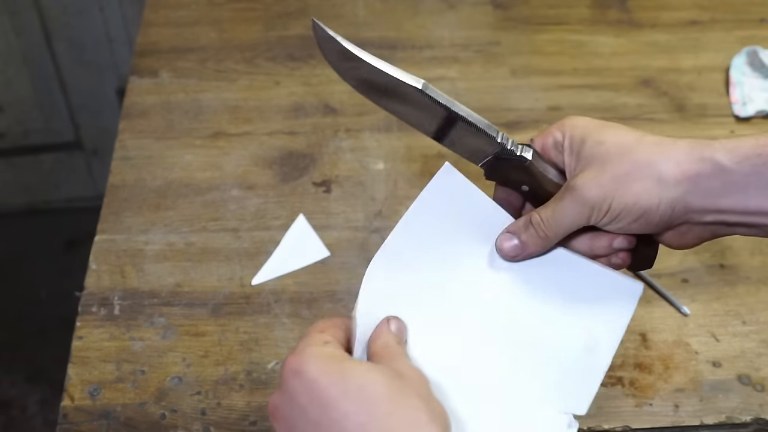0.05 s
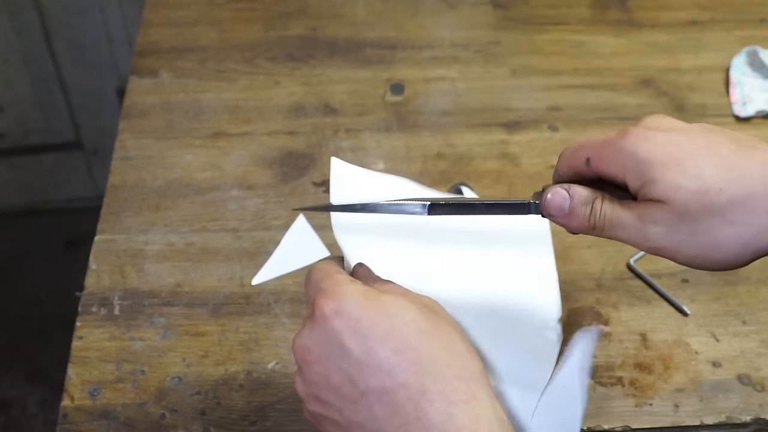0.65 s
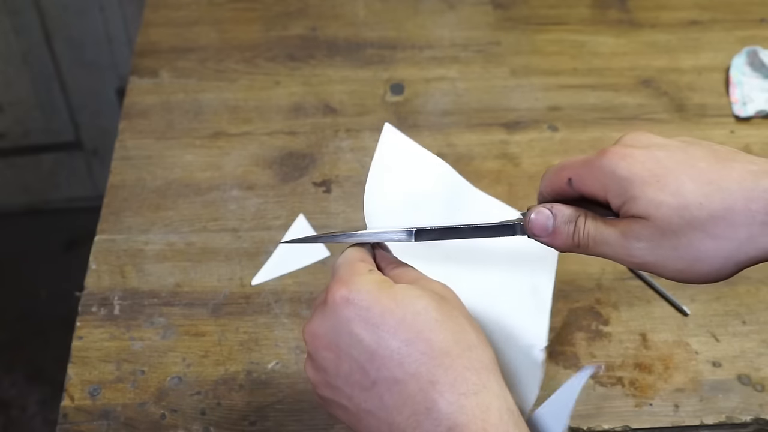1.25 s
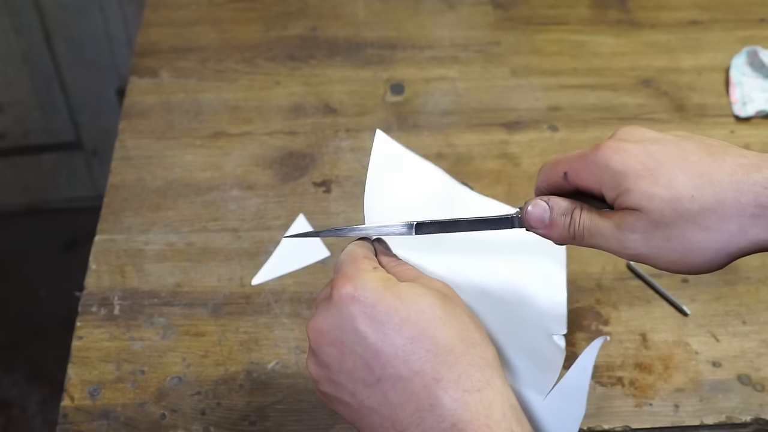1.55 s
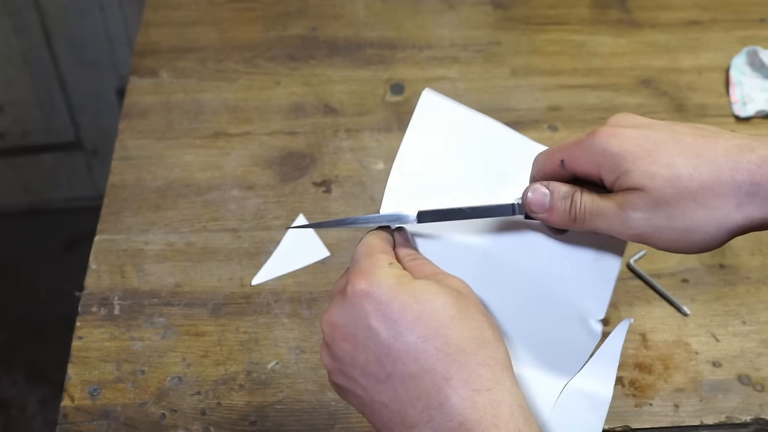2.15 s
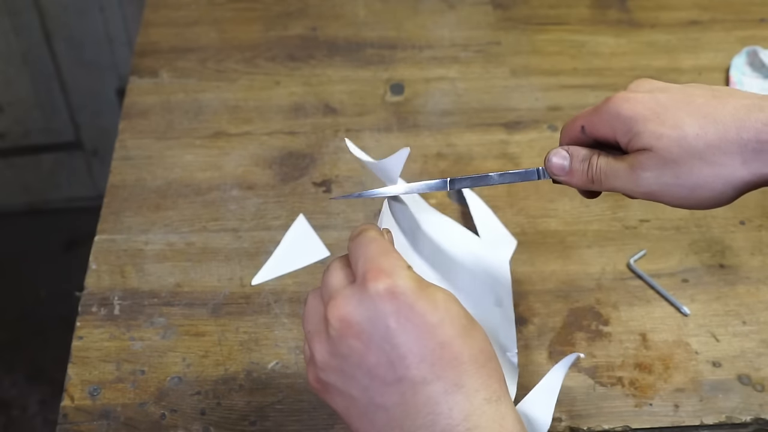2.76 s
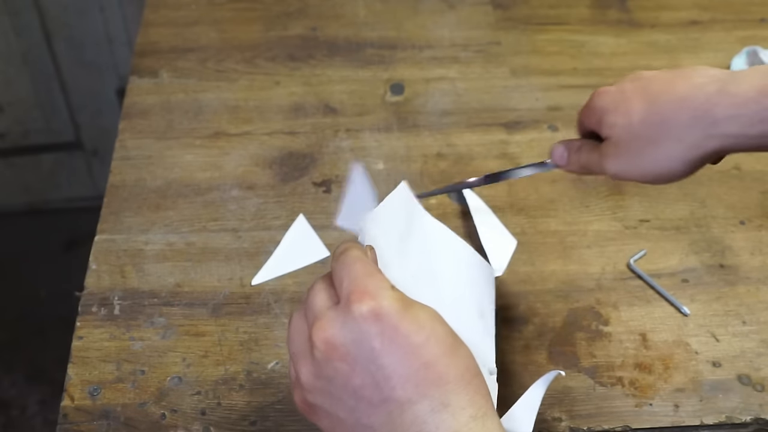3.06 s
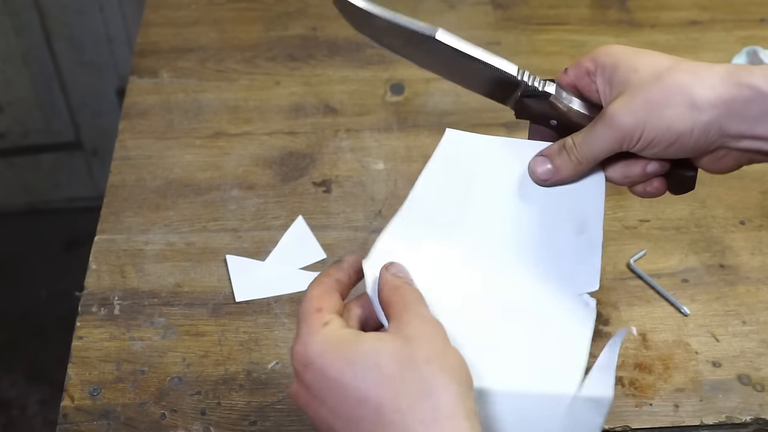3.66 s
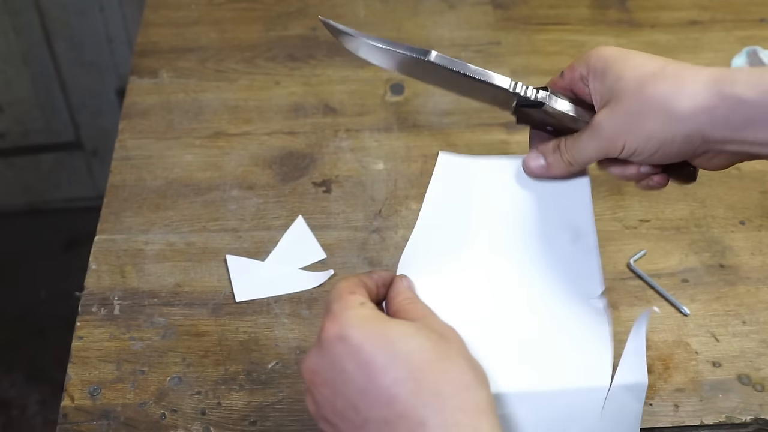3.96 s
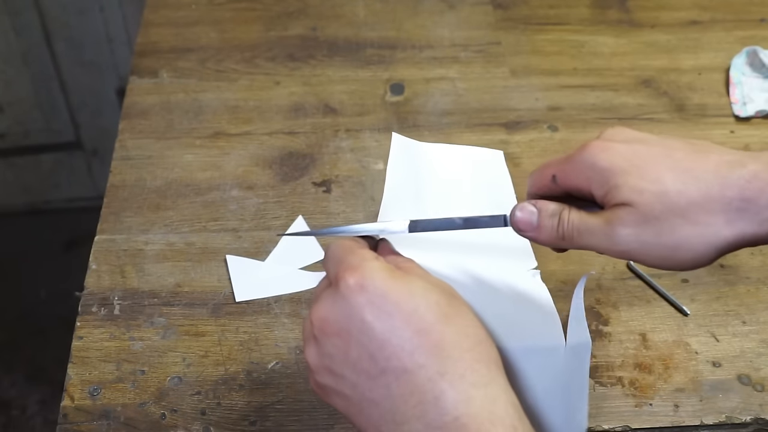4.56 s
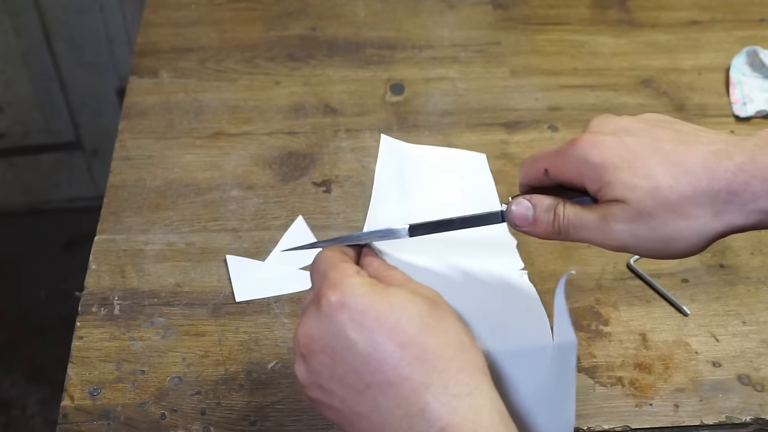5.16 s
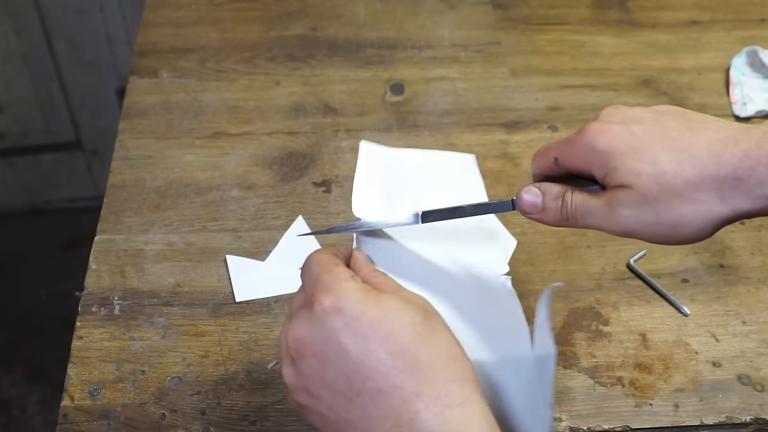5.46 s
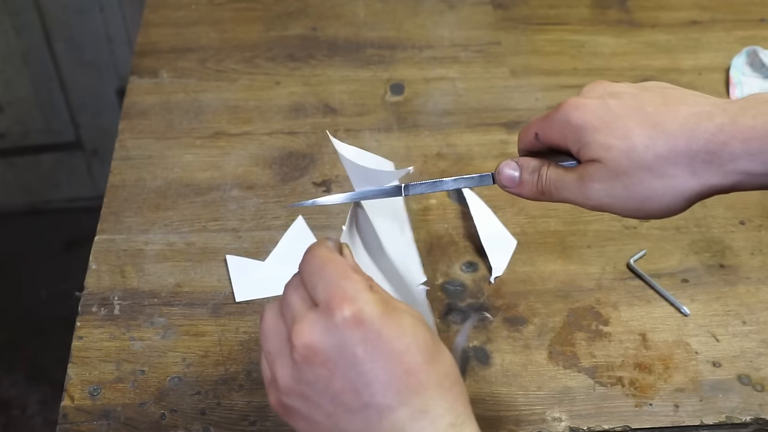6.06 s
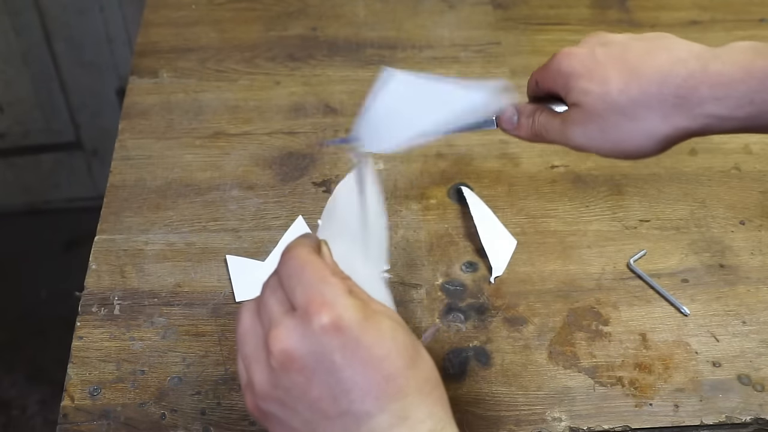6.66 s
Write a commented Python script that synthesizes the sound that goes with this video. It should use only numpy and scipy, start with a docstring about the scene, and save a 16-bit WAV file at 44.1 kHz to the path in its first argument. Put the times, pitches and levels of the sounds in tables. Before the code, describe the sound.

Paper rustles and pops in the fingers as a knife makes one long slice, then a run of short sawing cuts.

```python
"""At a wooden bench in a small workshop, a sharp knife slices a hand-held sheet of paper.
There is one long cut, a few quick strokes and later a sawing run of short cuts. Each is a dense
stream of snapping fibres that shake the sheet. Between cuts the paper slides in the fingers and
buckles with soft pops, and the blade ticks on its edge. The bench top and the room echo these
sounds over a quiet hush and a faint electrical whine."""
import sys
import numpy as np
from scipy import signal
from scipy.fft import rfft, irfft, next_fast_len
from scipy.io import wavfile
from scipy.ndimage import map_coordinates

SR = 44100
rng = np.random.default_rng(int(sys.argv[2]) if len(sys.argv) > 2 else 0)


def int16_out(signal):
    """Quantize to a 16-bit WAV file."""
    q = np.round(np.clip(np.atleast_2d(signal).T, -1, 1) * 32767)
    wavfile.write(sys.argv[1], SR, q.astype(np.int16))


N = 300762

# tone colour of the room's hush: (frequency [Hz], relative level [dB])
HUSH_COLOUR = [(26, -17), (45, -5.5), (173, -11), (268, -10.5), (303, -10.5), (600, -10), (1190, -16),
               (1310, -13.5), (13100, -23.5), (15500, -28.5)]
# the hush wavers: (time [s], level [dB])
HUSH_LEVELS = [(1, -62.5), (4, -60), (4.3, -66), (4.7, -65.5), (5.2, -62.5)]
# how alike the hush is in both ears: (frequency [Hz], likeness [1 = same])
HUSH_LIKENESS = [(40, 1), (150, 0.6), (500, 0), (2000, 0), (10000, 0.025)]
# electrical whine: (frequency [Hz], level [dB])
WHINE_TONES = [(12950, -86)]
# paper sliding: (start [s], rise [s], fall [s], level [dB], fizz adjustment [dB], resonance [Hz])
PAPER_SLIDES = [(.014, 0.021, 0.11, -42.5, -10, 2340), (.15, 0.041, 0.058, -46, -5, 2390),
                (.245, 0.047, 0.12, -53, 6, 2350), (.365, 0.068, 0.084, -50, 8, 2560),
                (.54, 0.018, 0.21, -52.5, 4, 2690), (.69, 0.028, 0.07, -56.5, 9, 2900),
                (.824, 0.012, 0.13, -53, 6, 3120), (1.003, .012, .15, -55, 11.5, 3340),
                (1.314, 0.015, 0.084, -52.5, -1, 2680), (1.413, .008, 0.041, -48.5, 1, 2500),
                (1.645, 0.015, 0.055, -58, -1, 2330), (1.91, 0.02, .12, -57.5, -1, 2300),
                (2.084, 0.024, 0.24, -53, -2, 2250), (3.25, 0.029, 0.2, -56, -2, 2280),
                (3.452, 0.029, 0.047, -51, -5, 2500), (3.532, 0.028, 0.11, -48, 3.5, 2440),
                (3.69, .02, 0.064, -53, -6, 2290), (3.74, 0.026, 0.26, -60, -22, 1980),
                (3.903, 0.063, 0.04, -46, 7, 3560), (4.453, 0.011, 0.044, -50.5, -4, 3230),
                (4.698, 0.075, 0.11, -57, 7, 3200), (4.84, 0.065, .09, -59.5, 3.5, 3150),
                (5.109, .02, 0.45, -60, 2, 3000)]
# tone colour of rubbing: (frequency [Hz], relative level [dB])
RUB_COLOUR = [(40, -35), (150, -27), (400, -6), (750, -1.5), (1200, -10), (2100, -0.5), (3500, 0.5),
              (5500, -2.5), (9000, -6.5), (16000, -9.5)]
# tone colour of the bright fizz: (frequency [Hz], relative level [dB])
FIZZ_COLOUR = [(300, -65.5), (2000, -17), (4500, -1.5), (7000, -1), (9800, 0), (11500, -2), (14000, -1),
               (16000, -10)]
# the sheet buckles: (time [s], level [dB], flap adjustment [dB], snap pitch [Hz], relative crumple [dB])
PAPER_POPS = [(0.0376, -26.5, -6.5, 2620, -9.5), (0.0465, -30.5, -1, 2100, -8.5),
              (0.1032, -32.5, -7, 2160, -15), (0.167, -29.5, -18, 2620, -14), (0.434, -44.5, 1, 4800, -16),
              (0.5108, -28, -15, 2840, -13), (0.5242, -30, -6, 2420, -11), (0.7424, -40.5, -6, 1770, -9.5),
              (0.7671, -34.5, -12.5, 2170, -7.5), (0.831, -35, -10.5, 1700, -15),
              (0.8772, -40, -8.5, 2920, -13), (1.197, -59, 10, 1990, -12), (1.3017, -62, 14, 2230, -9),
              (1.8928, -41, -1.5, 2370, -7.5), (1.9106, -37, -4.5, 1760, -8),
              (3.0027, -39, -4.5, 1900, -26), (3.441, -34.5, -10, 2600, -23), (3.5316, -30, -13, 3270, -20),
              (3.6207, -37.5, -7.5, 2620, -14.5), (3.9784, -44, 4, 2210, -28), (4.051, -47.5, 2, 1960, -23),
              (5.0709, -23, -19.5, 2880, -20), (5.0879, -18.5, -22, 3370, -23),
              (6.461, -28, -13, 3000, -21), (6.787, -60.5, 8.5, 2200, -24)]
# tone colour of a pop's snap: (frequency [multiple of its pitch], relative level [dB])
SNAP_COLOUR = [(.03, -25), (.2, -15.5), (.55, -3.5), (1, 2), (1.35, -5), (2, -17), (6, -37)]
# tone colour of a pop's low flap: (frequency [Hz], relative level [dB])
FLAP_COLOUR = [(30, -27), (140, -14), (290, -8.5), (390, 0), (540, -4), (780, 0), (1100, -7.5), (1800, -23),
               (5000, -55)]
# tone colour of tearing: (frequency [Hz], relative level [dB])
TEAR_COLOUR = [(60, -67), (300, -36), (1000, -18), (1450, -9.5), (1700, -3.5), (2500, -0.5), (3900, 0),
               (4700, -1), (6500, -6), (10000, -10.5), (16000, -28)]
# tone colour of the fluttering cut strip: (frequency [Hz], relative level [dB])
FLUTTER_COLOUR = [(50, -35.5), (135, -8), (280, 3.5), (450, 6), (1000, -47)]
# resonances, where the held sheet likes to ring: (frequency [Hz], width [Hz], relative level [dB])
SHEET_RESONANCES = [(412, 88, -11), (621, 124, -10.5), (779, 79, 0.5), (1140, 223, -7)]
# quick strokes, including rips out of the sheet: (start [s], rise [s], fall [s], level [dB],
# relative first bite [dB], relative drumming [dB], relative fizz [dB], resonance [Hz])
QUICK_CUTS = [(1.432, .056, 0.052, -43.5, -8, -7, 5, 2500), (2.92, 0.044, 0.024, -41, -17, -7, 11, 2400),
              (5.24, 0.12, 0.081, -33, -13, -21.5, 2.5, 3140),
              (5.587, 0.11, 0.087, -37.5, -8.5, -9.5, 4, 3140),
              (5.837, 0.088, 0.098, -34.5, -8, -10.5, -2, 2580),
              (6.064, 0.088, 0.11, -36.5, -17, -8, -4.5, 2200),
              (6.348, 0.13, .15, -37.5, -14.5, -6, 3, 2700),
              (6.52, 0.048, 0.069, -39, -10, -4.5, 6.5, 2640)]
# the long cut: (time [s], level [dB], relative drumming [dB], relative fizz [dB])
LONG_CUT_LEVELS = [(2.17, -47, -17, 4), (2.18, -39.5, -11, 7), (2.226, -36.5, -14, 2.5),
                   (2.24, -30, -20, -6), (2.28, -33, -15.5, 2), (2.304, -31.5, -22.5, 2.5),
                   (2.394, -33, -25.5, -2), (2.468, -39, -18, -4.5), (2.88, -39.5, -7.5, 0),
                   (2.956, -40, -2.5, 8.5), (3.026, -44, -10.5, 0.5), (3.07, -56, -7, -3)]
# the paper tightens in the long cut, ringing higher, then slackens: (time [s], resonance [Hz])
LONG_CUT_RESONANCE = [(2.27, 2250), (2.33, 5300), (2.39, 4800), (2.46, 2120), (2.8, 2400), (2.9, 1900)]
# the blade ticks on the paper: (time [s], level before the trims in blade_ticks [dB])
BLADE_TICKS = [(2.1798, -24.5), (3.158, -50), (3.1619, -26)]
# the blade's ringing tones: (frequency [Hz], relative level [dB], time to fade by 60 dB [s])
STEEL_TONES = [(1908, -2, .04), (3127, -6, .04), (3716, 4, .11), (3802, -5, .07), (12300, -6, .12)]
# the room's echo: (frequency [Hz], time to fade by 60 dB [s])
ROOM_FADE = [(150, 0.97), (700, 0.41), (2500, 0.35), (7000, 0.33), (15000, 0.18)]
# how alike the echoes are in both ears: (frequency [Hz], likeness [1 = same])
ECHO_LIKENESS = [(150, 0.86), (600, 0.81), (1400, 0.43), (4000, -0.033), (15000, -0.073)]
# the two microphones differ in tone: (frequency [Hz], left minus right [dB])
MIC_BALANCE = [(200, 0.5), (700, -2.5), (1300, 0.6), (2400, -0.6), (8000, 1.5), (14000, 2.5)]


def amp(db):
    """Turn decibels into a number to multiply by."""
    return 10 ** (np.asarray(db) / 20)


def unit(x):
    """Scale x to an average power of 1."""
    return x / np.sqrt(np.mean(x ** 2) + 1e-20)


def along(points, hz):
    """Read between the rows of a (frequency, value) table, on a pitch scale."""
    freqs, values = np.transpose(points)
    return np.interp(np.log(hz + 1), np.log(freqs + 1), values)


def wobble(rate, size):
    """A smooth random curve through rate points a second."""
    return map_coordinates(rng.standard_normal(400), [np.arange(size) * rate / SR], mode="wrap")


def filtered(x, response):
    """Multiply each frequency in x by response(frequency)."""
    size = x.shape[-1]
    padded = next_fast_len(size + 8192)
    return irfft(rfft(x, padded) * response(np.fft.rfftfreq(padded, 1 / SR)), padded)[..., :size]


def coloured(x, colour, size=2048):
    """Give x a tone colour, at an average power of 1."""
    cepstrum = irfft(np.log(amp(along(colour, np.fft.rfftfreq(size, 1 / SR)))))
    # this fold makes the filter ring only after a click, never before it
    cepstrum[1:size // 2] *= 2
    cepstrum[size // 2 + 1:] = 0
    ring = irfft(np.exp(rfft(cepstrum)))
    return unit(signal.fftconvolve(x, ring)[:len(x)])


def add(track, start_s, x):
    """Mix x into track from start_s on."""
    start = max(round(start_s * SR), 0)
    part = track[..., start:start + x.shape[-1]]
    part += x[..., :part.shape[-1]]


def stereo(x, likeness):
    """Blend two unrelated signals into a left and a right that are partly alike."""
    turn = lambda hz: np.arccos(np.clip(along(likeness, hz), -1, 1)) / 2
    mid, side = filtered(x, lambda hz: np.array([np.cos(turn(hz)), np.sin(turn(hz))]))
    return np.array([mid + side, mid - side])


def panned(db):
    """Left and right gains that make the left louder by db."""
    return amp(np.array([[.5], [-.5]]) * db)


def room_air():
    """A quiet hush, alike in both ears only in the bass, and a thin electrical whine."""
    t = np.arange(N) / SR
    noise = stereo(rng.standard_normal((2, N)), HUSH_LIKENESS)
    hush = filtered(noise, lambda hz: amp(along(HUSH_COLOUR, hz)))
    whine = sum(amp(db) * np.sqrt(2) * np.sin(2 * np.pi * hz * t + 1.5 * wobble(55, N))
                for hz, db in WHINE_TONES)
    return amp(np.interp(t, *np.transpose(HUSH_LEVELS))) * unit(hush) + whine


def stroke(rise_s, fall_s, bite_s, entry_db, fall_power):
    """One sweep of the hand swells, then drops 20 dB in fall_s. Gives (time from peak, gain)."""
    t = np.arange(0, rise_s + 2 * fall_s, 1 / SR)
    swell_db = entry_db * np.clip(1 - t / rise_s, 0, 1) ** 2
    release_db = -20 * np.clip((t - rise_s) / fall_s, 0, None) ** fall_power
    return t - rise_s, np.clip(t / bite_s, 0, 1) * amp(swell_db + release_db)


def fibres(size, per_s, spread_db, clump_db):
    """Paper fibres snap: random clicks of uneven strength that come in clumps."""
    snaps = (rng.random(size) < per_s / SR) * rng.standard_normal(size)
    strength_db = spread_db * rng.standard_normal(size) + clump_db * wobble(172.9, size)
    return unit(snaps * amp(strength_db))


def paper_resonance(x, centre_hz, width_octaves, lift_db=3.5):
    """The paper boosts one broad band of sound, higher in pitch the tighter it is held."""
    hz, t, spectra = signal.stft(x, SR, nperseg=256)
    centre = np.interp(t, np.arange(len(x)) / SR, centre_hz * np.ones(len(x)))
    octaves = np.log2((hz[:, None] + 1) / centre)
    boost = amp(lift_db * np.exp(-(octaves / width_octaves) ** 2))
    return signal.istft(spectra * boost, SR, nperseg=256)[1][:len(x)]


def paper_slides():
    """Paper rubs over skin and steel with a fine, soft grain."""
    out = np.zeros(N)
    for start_s, rise_s, fall_s, db, fizz_db, hz in PAPER_SLIDES:
        _, swell = stroke(rise_s, fall_s, bite_s=0.0028, entry_db=-9.5, fall_power=1.48)
        grain = fibres(len(swell), per_s=14000, spread_db=0.5, clump_db=2.0)
        rub = coloured(grain, RUB_COLOUR) + amp(fizz_db - 7.0) * coloured(grain, FIZZ_COLOUR)
        add(out, start_s, amp(db) * swell * paper_resonance(rub, hz, width_octaves=0.59))
    return out


def burst(colour, fade_s, crumple_db=-60, size=12000):
    """A short crack fades by 60 dB in fade_s; the crease goes on crumpling softly."""
    t = np.arange(size) / SR
    crack = rng.standard_normal(size) * amp(-60 * t / fade_s)
    crumple = fibres(size, per_s=2500, spread_db=2.0, clump_db=6.5) * amp(crumple_db - 60 * t / 0.21)
    strength = np.sqrt(np.mean(crack ** 2 + crumple ** 2)) / 1.88
    return strength * coloured(crack + crumple, colour)


def paper_pops():
    """A bend in the sheet flips through: a snap and a slower flap."""
    out = np.zeros((2, N))
    for start_s, db, flap_db, hz, crumple_db in PAPER_POPS:
        snap_colour = [(multiple * hz, level) for multiple, level in SNAP_COLOUR]
        snap = burst(snap_colour, fade_s=.022, crumple_db=crumple_db)
        flap = amp(flap_db + 5.5) * burst(FLAP_COLOUR, fade_s=.04, crumple_db=crumple_db)
        place = panned(rng.normal(-2, 1.5))  # scattered a little to the right
        add(out, start_s, place * amp(db) * (snap + flap))
    return out


def sheet_drum(hz):
    """How the held sheet answers each frequency, like a small drum."""
    return sum((-1) ** k * amp(db) * 1j * hz * width / (centre ** 2 - hz ** 2 + 1j * hz * width)
               for k, (centre, width, db) in enumerate(SHEET_RESONANCES))


def tearing(t, drum_db, fizz_db, centre_hz):
    """The edge parts fibres; the same snaps rasp, fizz, drum the sheet and shake the cut strip."""
    thick = amp(-11.5) * fibres(len(t), per_s=260, spread_db=3.5, clump_db=3.5)
    fine = fibres(len(t), per_s=14000, spread_db=0.0, clump_db=0.4)
    snaps = unit(fine + thick)
    freed_s, held_db, loose_db = 5.94, -25.5, -12.5  # the strip flutters more once it hangs loose
    flutter = amp(np.where(t < freed_s, held_db, loose_db)) * coloured(snaps, FLUTTER_COLOUR)
    drum = amp(drum_db) * (unit(filtered(snaps, sheet_drum)) + flutter)
    fizz = amp(fizz_db) * coloured(snaps, FIZZ_COLOUR)
    return paper_resonance(coloured(snaps, TEAR_COLOUR) + drum + fizz, centre_hz, width_octaves=0.52)


def quick_cuts():
    """In each quick stroke the edge bites at once, speeds up and runs out."""
    out = np.zeros(N)
    sag_octaves_per_s = 0.71  # the paper slackens, so its resonance sinks
    for start_s, rise_s, fall_s, db, bite_db, drum_db, fizz_db, hz in QUICK_CUTS:
        from_peak, swell = stroke(rise_s, fall_s, bite_s=0.014, entry_db=bite_db, fall_power=1.76)
        centre_hz = hz * 2 ** (-sag_octaves_per_s * from_peak)
        tear = tearing(start_s + rise_s + from_peak, drum_db, fizz_db, centre_hz)
        add(out, start_s, amp(db) * swell * tear)
    return out


def long_cut():
    """The blade is drawn through the whole sheet in one go."""
    out = np.zeros(N)
    times, *levels = np.transpose(LONG_CUT_LEVELS)
    t = np.arange(times[0], times[-1], 1 / SR)
    db, drum_db, fizz_db = (np.interp(t, times, column) for column in levels)
    centre_hz = np.interp(t, *np.transpose(LONG_CUT_RESONANCE))
    bite_s, release_s = 0.004, 0.06
    contact = np.clip(np.minimum((t - times[0]) / bite_s, (times[-1] - t) / release_s), 0, 1)
    add(out, times[0], contact * amp(db) * tearing(t, drum_db, fizz_db, centre_hz))
    return out


def blade_ticks():
    """The blade catches or flicks off the paper's edge; the steel rings briefly, damped by the hand."""
    out, t = np.zeros(N), np.arange(SR // 3) / SR
    ring_trim_db, click_trim_db = -22, -2.5
    for start_s, db in BLADE_TICKS:
        ring = sum(amp(level - 60 * t / fade_s) * np.sin(2 * np.pi * (hz * t + rng.random()))
                   for hz, level, fade_s in STEEL_TONES)
        click = burst(FIZZ_COLOUR, fade_s=0.02) + burst(RUB_COLOUR, fade_s=0.023)
        add(out, start_s, amp(db + ring_trim_db) * ring)
        add(out, start_s, amp(db + click_trim_db) * click)
    return panned(2.5) * out


def echoes(near_db, tail_db, near_fade_s):
    """Two echo patterns: quick bounces off bench and hands, then the room, whose treble dies first."""
    hz, t, spectra = signal.stft(rng.standard_normal((2, SR // 3)), SR, nperseg=256)
    fade = amp(-60 * t / along(ROOM_FADE, hz)[:, None])
    build_up = np.clip(t / 0.0063, 0, 1)
    tail = signal.istft(spectra * fade * build_up, SR, nperseg=256)[1]
    size = tail.shape[1]
    near = rng.standard_normal(tail.shape) * amp(-60 * np.arange(size) / SR / near_fade_s)
    return (amp(near_db) * unit(near) + amp(tail_db) * unit(tail)) / np.sqrt(size)


def workshop(x, near_db, tail_db, near_fade_s, size=12000):
    """The direct sound plus echoes whose pattern keeps changing as hands and sheet move."""
    direct, echoed = x * np.ones((2, 1)), np.zeros((2, N))
    crossfade = np.sin(np.pi * np.arange(size) / size)
    for start in range(0, N, size // 2):
        part = direct[:, start:start + size].mean(axis=0, keepdims=True)
        pattern = echoes(near_db, tail_db, near_fade_s)
        add(echoed, start / SR, signal.fftconvolve(part * crossfade[:part.shape[1]], pattern, axes=1))
    total_power = 1 + (amp(near_db) ** 2 + amp(tail_db) ** 2) / 2
    return (direct + stereo(echoed, ECHO_LIKENESS)) / np.sqrt(total_power)


def scene():
    """Slicing and handling echo off the bench and the room, over the quiet air."""
    slicing = long_cut() + quick_cuts() + paper_slides()
    slicing = workshop(slicing, near_db=2.0, tail_db=-3.5, near_fade_s=0.045)
    snapping = workshop(paper_pops() + blade_ticks(), near_db=-1.5, tail_db=-2.5, near_fade_s=0.11)
    return slicing + snapping + room_air()


def record(dry):
    """Two microphones each colour the sound a little, and the highest treble is cut off."""
    top_hz = 15850
    return filtered(dry, lambda hz: panned(along(MIC_BALANCE, hz)) * (hz < top_hz))


dry = scene()
out = record(dry)
int16_out(out)
```